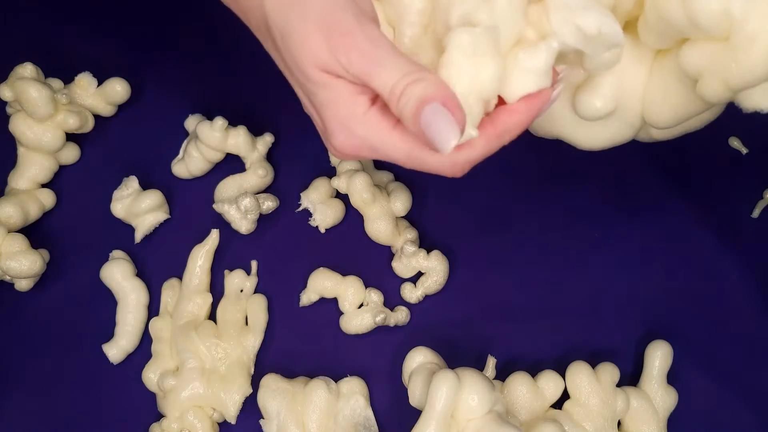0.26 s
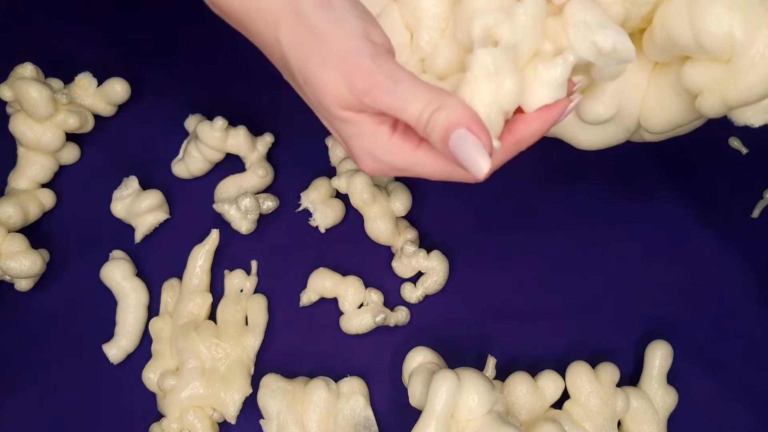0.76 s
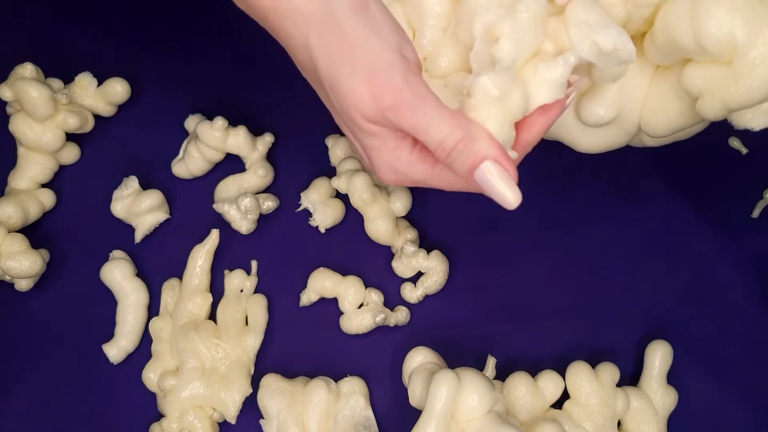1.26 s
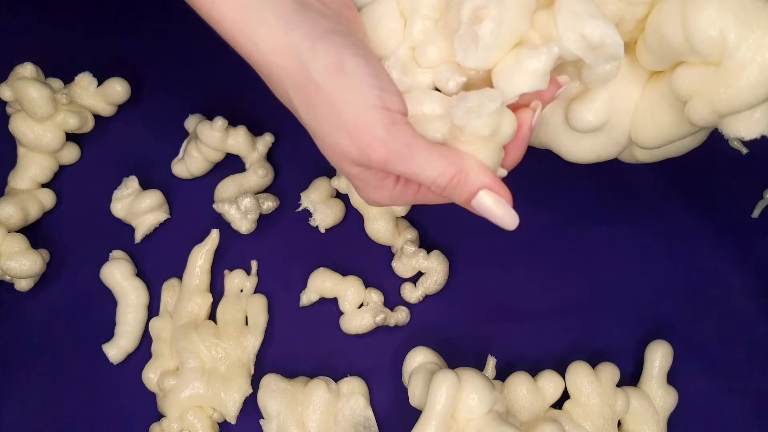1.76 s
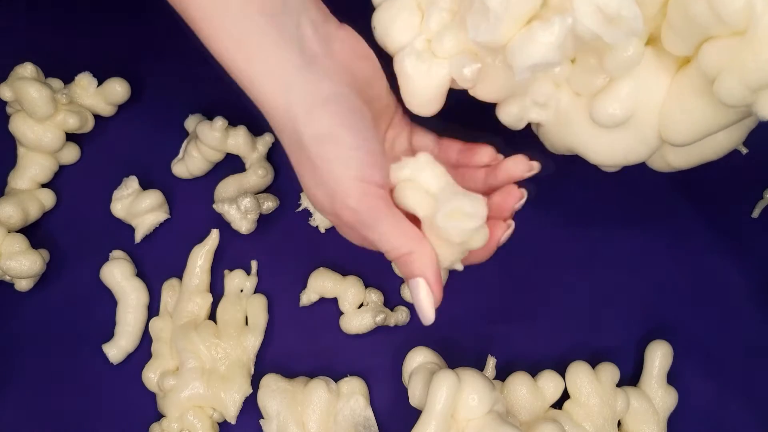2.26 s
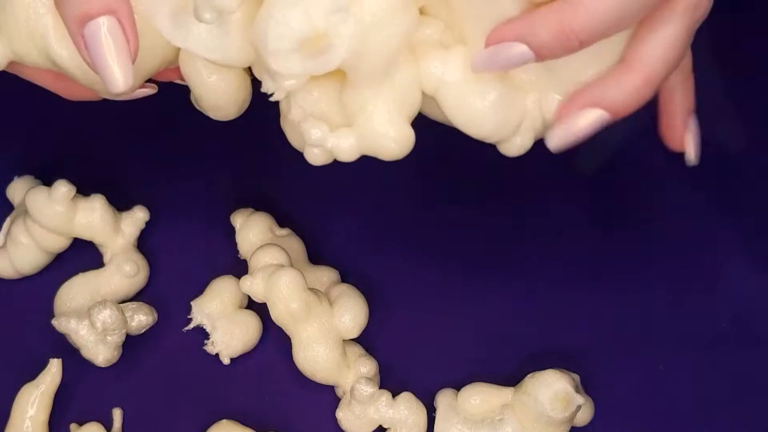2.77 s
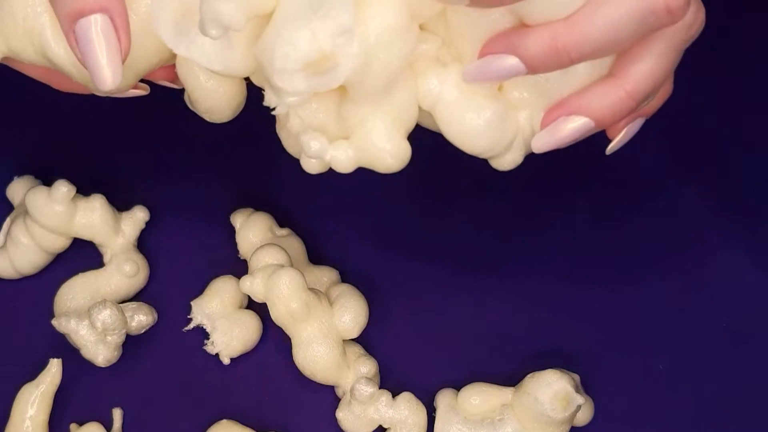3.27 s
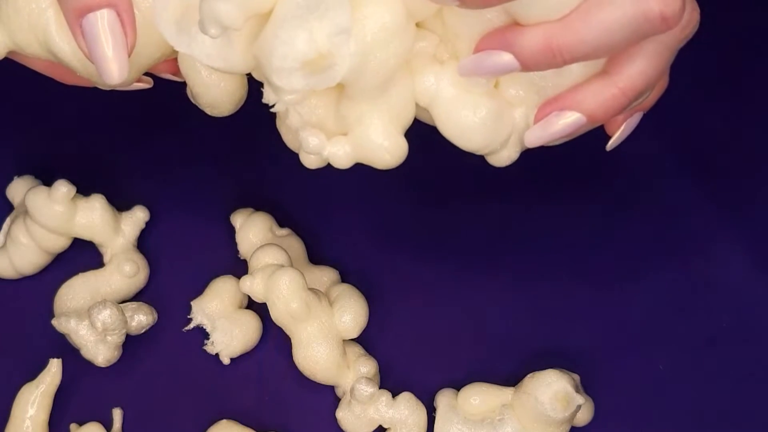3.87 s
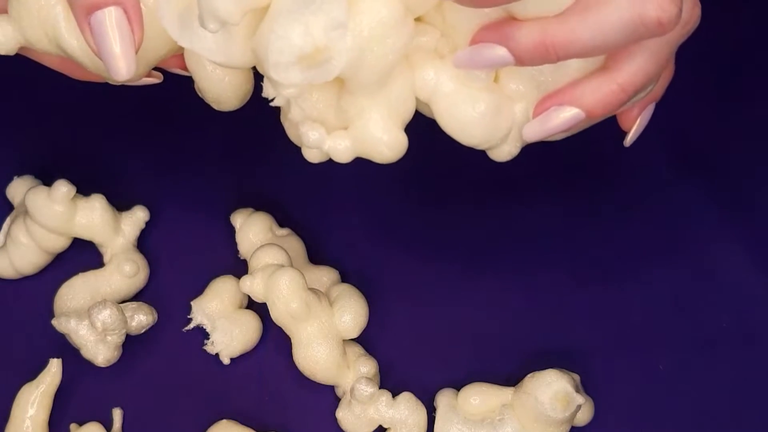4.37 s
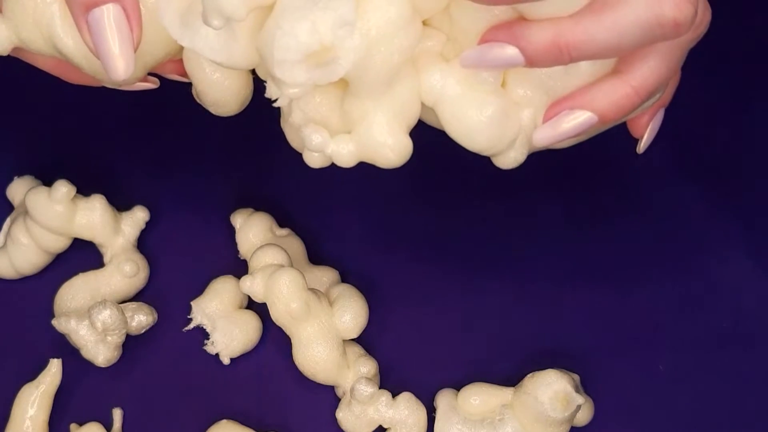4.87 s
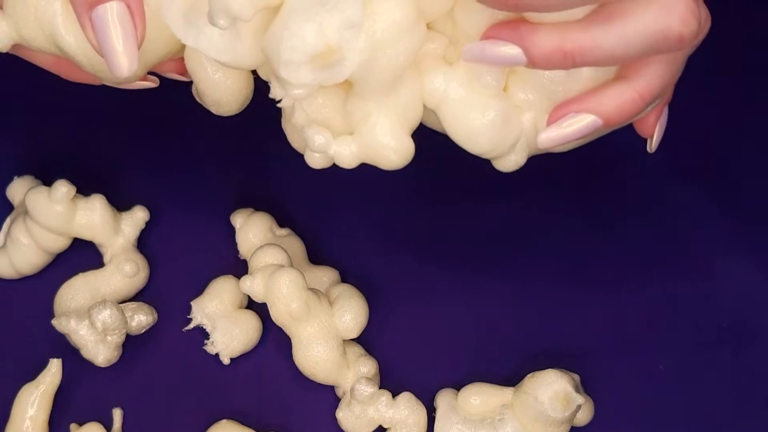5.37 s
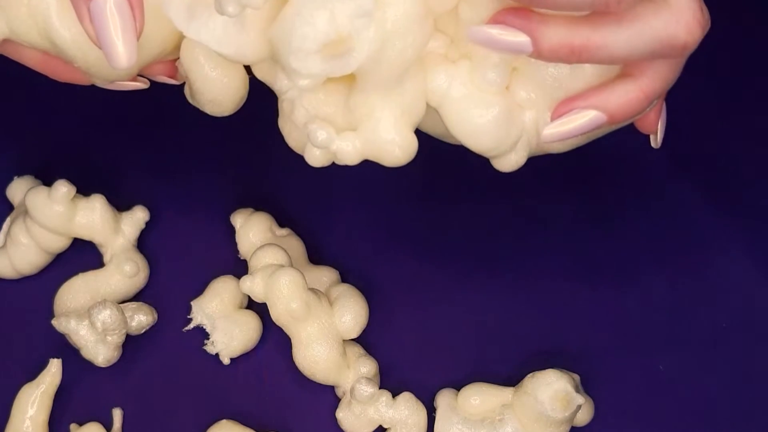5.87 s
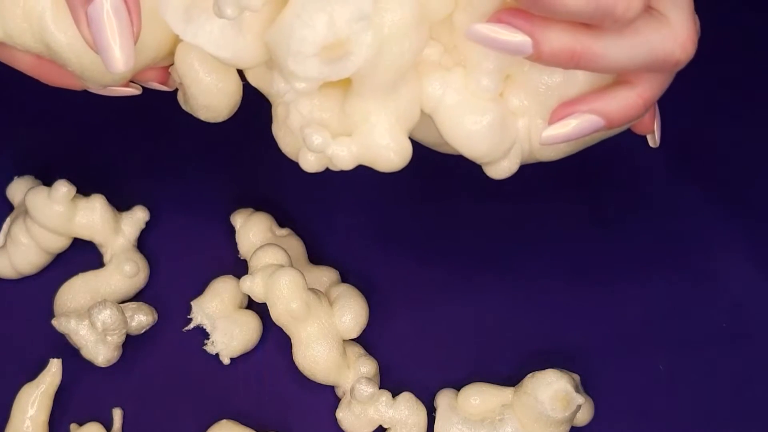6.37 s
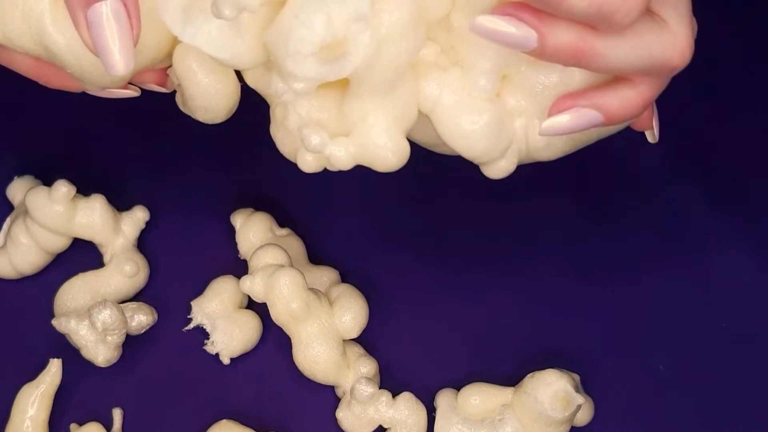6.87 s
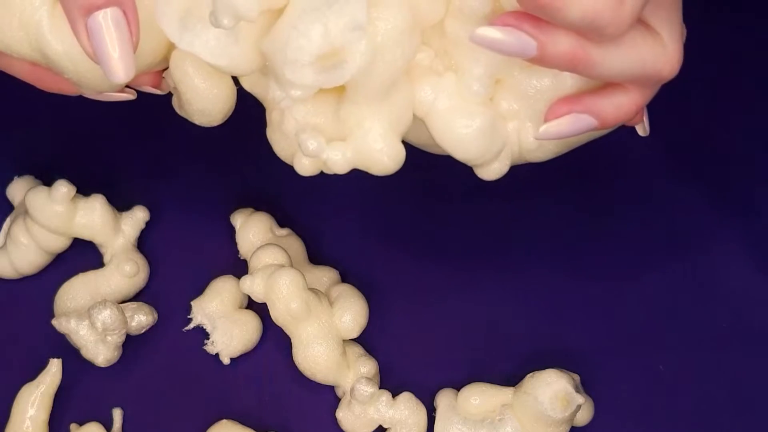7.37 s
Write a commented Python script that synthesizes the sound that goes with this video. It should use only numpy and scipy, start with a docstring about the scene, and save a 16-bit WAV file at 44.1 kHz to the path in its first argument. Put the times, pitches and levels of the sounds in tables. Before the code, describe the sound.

Two hands tear a lump of hardened expanding foam loose with crunchy rips and sharp cracks, then knead the block in dry, crackling squeezes.

```python
"""Tearing and squeezing cured foam

Two hands tear a lump off a block of expanding foam, lay it on cloth, then squeeze the block, near a spaced pair.
Thin cell walls snap in avalanches of short noise pulses (the crunch); struts give way in single cracks.
Every snap is a damped noise burst; filters colour it as lump or block. Rubbing, knocks and creaks join in.
The room is small and quiet: faint air, a low rumble of the arms and a short, dull tail."""
import sys
import numpy as np
from scipy import signal
from scipy.fft import rfft, irfft
from scipy.io import wavfile
from scipy.ndimage import uniform_filter1d

SR = 44100
rng = np.random.default_rng(int(sys.argv[2]) if len(sys.argv) > 2 else 0)


def dump_mix(stems):
    """Bounce the given channels to the path in sys.argv[1] as a 16-bit WAV at rate SR."""
    frames = np.atleast_2d(stems).T  # one column per channel
    limited = np.clip(frames, -1, 1)  # hard clip at full scale
    pcm = np.round(limited * 32767).astype(np.int16)
    wavfile.write(sys.argv[1], SR, pcm)


N = 335601
TIME = np.arange(N) / SR  # [s]

# Levels in the tables are relative; balance trims follow in the functions. Pan is left minus right.
# struts giving way: (time [s], level [dB], body [dB], treble edge [dB], relative decay [s])
CRACKS = [(0.053, -33, -6.5, -8, 0.0052), (0.1946, -17, 12.5, -9.5, 0.014),
          (0.3437, -36.5, 10.5, -9, 0.011), (0.469, -44.5, -3, -8.5, 0.0072),
          (0.6866, -40.5, -11, -11, 0.017), (0.8374, -21, 2.5, -8.5, 0.043), (0.8505, -27.5, -6, -13, .007),
          (0.8722, -28.5, -17, -7, 0.012), (1.029, -30, 0, 21, 0.0079), (1.0479, -25, -14, -22, 0.011),
          (1.0931, -18, 3, -14, 0.0099), (1.114, -26, 9.5, 0, .012), (1.171, -31, 8, 3, 0.013),
          (1.2062, -36, 5.5, -1, 0.0062), (1.2779, -40, -1, -5, 0.0066), (1.2957, -49.5, -9, -1, 0.0078),
          (1.37, -29, 6.5, 1, 0.012), (1.4593, -23, 7, -8, .019), (1.4816, -25, 7, -12, 0.007),
          (1.543, -21, 3.5, -11, 0.043), (1.6255, -39, 2, -8, 0.014), (1.703, -19.5, 6, -14, 0.0071),
          (1.7333, -18.5, 5.5, -20, .008), (2.326, -56, -8, -2, 0.0067), (3.0093, -27, 3.5, -13, 0.0051),
          (3.0682, -44, 7, -3, 0.009), (3.3437, -38, 6.5, -1.5, 0.0067), (3.4315, -36.5, 9, 4.5, 0.013),
          (3.4873, -43.5, 6, 4, 0.015), (3.608, -28, 1.5, -3, 0.011), (3.634, -24.5, 7, 0.5, .011),
          (3.7038, -34.5, 1, 0, 0.027), (3.9346, -40, 3, -4, 0.0083), (3.9688, -35, 4.5, -7, 0.01),
          (3.98, -32, 7.5, -2, 0.037), (4.1709, -40, 1, -4, 0.0062), (4.2651, -19.5, 8, -9, 0.0042),
          (4.315, -34, 5, 3, 0.0084), (4.3526, -38, 4, -2, 0.0074), (4.3807, -40, 7, -1, 0.0057),
          (4.439, -15.5, 7, -23, 0.006), (4.4433, -19.5, 9, -3, 0.0046), (4.5089, -36.5, 18, 14, 0.0058),
          (4.6352, -41.5, 5, 16, 0.0052), (4.921, -39, 1, -4, 0.0073), (4.951, -28.5, 5, -3, .008),
          (5.0378, -31, 4.5, 4, 0.0058), (5.152, -40, 12, 7, 0.0078), (5.23, -36, -12, 4, .014),
          (5.333, -29.5, 8, 3, 0.006), (5.4689, -23.5, 5.5, -1, 0.0042), (5.5976, -37, 13.5, 3.5, 0.03),
          (5.7165, -33, 5, -7, 0.006), (5.7319, -28.5, 4.5, -5.5, 0.016), (5.7644, -28.5, -19, -7, .026),
          (5.893, -33, -2, -5.5, 0.011), (6.0924, -33, 2, 10, 0.0074), (6.1062, -29.5, 0, -5, .011),
          (6.158, -30.5, 1, 0, 0.036), (6.3216, -34, -3, 4, .005), (6.369, -28.5, 3, -3, 0.009),
          (6.4387, -32, 9, 1, 0.0032), (6.589, -32, 2, 0.5, 0.0081), (6.6631, -29, -1, 1, 0.0046),
          (6.7219, -28.5, -7, -12, 0.0081), (6.8744, -29, -2, -2.5, 0.0064), (6.912, -32.5, -15, -8, 0.018),
          (7.018, -40, 2, -4, .01), (7.176, -24, -2, -7, 0.0061), (7.225, -33, 1, -2, 0.01),
          (7.284, -32, 2, -4, .012), (7.4605, -33.5, -3, -10, 0.0069), (7.5676, -42, 2, -9, 0.013)]
# soft knocks of hand and foam: (time [s], level [dB], treble tilt [dB], pan [dB], t60 [s])
KNOCKS = [(0.203, -36.5, -17, -3, 0.031), (.3445, -48, -19, -18, 0.032), (0.846, -54, -15, -2, 0.061),
          (1.106, -38, -20, -11.5, 0.13), (1.47, -35.5, -20, -12, 0.076), (1.737, -35, -13, -5, 0.028),
          (1.9093, -47.5, -9.5, 0.5, 0.03), (2.492, -62.5, -12, -5, 0.088), (2.511, -49.5, -41, -11, 0.055),
          (2.835, -55.5, -30, -2, .05), (2.877, -47.5, -11, 3, 0.044), (4.443, -46, -21, 0, .06)]
# pulls that rip the neck of the lump: (time of peak [s], build-up [s], let-go [s], level [dB])
PULLS = [(0.03, 0.17, 0.085, -43), (0.145, .04, 0.033, -48), (0.235, 0.053, 0.087, -28),
         (0.36, .025, .09, -54.5), (0.665, 0.055, .04, -53.5), (0.84, 0.13, 0.19, -34),
         (1.11, 0.15, .14, -32.5), (1.48, 0.11, 0.12, -29), (1.715, 0.068, 0.034, -40)]
# strokes of skin and cloth on the lump: (time of peak [s], build-up [s], let-go [s], level [dB])
STROKES = [(2.05, 0.092, .1, -66), (2.15, 0.076, 0.065, -63.5), (2.27, 0.067, .06, -54),
           (2.365, 0.015, 0.045, -59.5), (2.495, 0.015, 0.024, -51), (2.58, 0.057, 0.039, -48),
           (2.72, .15, 0.13, -64), (2.86, 0.068, .06, -62.5)]
# short squeezes of the block: (time of peak [s], build-up [s], let-go [s], level [dB])
SQUEEZES = [(3.05, 0.17, .06, -49.5), (3.22, 0.23, 0.18, -56.5), (3.37, 0.028, 0.075, -45.5),
            (3.5, 0.087, 0.11, -49.5), (3.615, 0.038, 0.12, -43), (3.88, 0.11, 0.14, -54),
            (4.08, 0.14, 0.19, -48), (4.3, 0.24, 0.12, -42), (4.45, 0.03, 0.13, -45.5),
            (4.975, 0.034, 0.081, -36.5)]
# crunch of one long, kneading squeeze: (time [s], level [dB])
KNEAD = [(4.6, -75.5), (4.8, -54), (5.1, -48.5), (5.33, -38.5), (5.43, -49), (5.5, -38.5), (5.69, -45),
         (5.76, -36.5), (5.89, -41.5), (6.02, -35), (6.2, -41.5), (6.38, -34), (6.52, -47.5), (6.72, -36),
         (6.79, -45.5), (6.93, -32.5), (7.05, -46.5), (7.31, -40.5), (7.385, -55), (7.47, -43),
         (7.61, -55.5)]
# finger depth in the block: (time [s], depth [0-1], pan [dB])
GRIP = [(2.9, 0.6, 1.5), (3.3, 0.46, 3.5), (3.6, 0.44, 4), (4.2, 0.45, 2.5), (4.65, 0.1, 6), (5.0, 0.2, 5),
        (5.35, 0.38, 4), (5.75, 0.58, 3.5), (6.1, 0.7, 3.5), (6.5, 0.3, 4), (6.9, 0.37, 3), (7.2, 1, 3),
        (7.6, 1, 3.5)]
# creaks of the block shifting in the hands: (time of peak [s], build-up [s], let-go [s], level [dB])
CREAKS = [(4.5, .06, 0.046, -60), (5.63, 0.069, .05, -59.5)]
# low rumble of the arms moving over the table: (time [s], level [dB])
RUMBLE = [(0, -66), (.25, -60.5), (.6, -63.5), (1.1, -65.5), (1.75, -60.5), (2.0, -64), (2.45, -66),
          (2.52, -50), (2.6, -60), (2.88, -66), (3.0, -76.5), (7.6, -72)]
# resonances of the big block: (frequency [Hz], relative level [dB], t60 [s])
BLOCK_MODES = [(291.3, -46, 0.31), (437, -73, 0.39), (687, -40.5, 0.037)]

# spectrum of a snapping strut: (frequency [Hz], gain [dB])
CRACK_COLOUR = [(30, -28.5), (100, -18.5), (200, -23.5), (420, -16), (540, -19.5), (680, -9), (900, -8),
                (1400, -10), (2200, 0), (3800, 4.5), (6000, 8.5), (9000, 4), (13000, 0), (16000, -12)]
# spectrum of the ripping neck: (frequency [Hz], gain [dB])
TEAR_COLOUR = [(30, -24), (120, -18.5), (250, -14), (550, -12), (750, -14.5), (1300, -10), (1600, 1),
               (2100, -0.5), (2800, -0.5), (3700, 3.5), (6000, 0.5), (8500, -2), (12500, -8),
               (15500, -14.5)]
# spectrum of the lump sliding under pressure: (frequency [Hz], gain [dB])
RUB_COLOUR = [(180, -44), (300, -12.5), (568, -17), (658, -4.5), (2000, -8.5), (2560, -5), (5440, -10.5),
              (6620, -11.5), (15000, -33.5)]
# spectrum of the crushed block: (frequency [Hz], gain [dB])
SQUEEZE_COLOUR = [(60, -16), (250, -17.5), (450, -20), (560, -23.5), (660, -16), (790, -16), (980, -4.5),
                  (1350, -18), (2000, -2.5), (3500, 1.5), (5500, 0.5), (8000, 1), (10500, -4), (15500, -8)]
# spectrum of the soft knocks: (frequency [Hz], gain [dB])
KNOCK_COLOUR = [(25, -6), (80, -2), (180, -14.5), (300, -18), (440, -2.5), (850, 0.5), (1500, -2.5),
                (2400, -15.5), (4000, -14.5), (8000, -32), (15000, -43)]
# spectrum of the low creaks: (frequency [Hz], gain [dB])
CREAK_COLOUR = [(60, -18), (170, -8.5), (280, 0), (400, -6), (600, -18), (2000, -48)]
# spectrum of the still room air: (frequency [Hz], gain [dB])
ROOM_COLOUR = [(20, 4), (70, -6.5), (160, -11.5), (270, -8.5), (500, -18), (1400, -24), (3500, -23),
               (10000, -32), (16000, -38.5)]
# further spectra: (frequency [Hz], gain [dB])
RUMBLE_COLOUR = [(15, 1.5), (40, -0.5), (85, -10), (160, -27), (400, -49.5), (2000, -69.5)]
TAIL_COLOUR = [(200, 9.5), (2000, 2.5), (5000, -2), (12000, -19)]
PROXIMITY_COLOUR = [(30, -1), (90, 4.5), (170, 5.5), (300, -7.5), (700, -29.5), (3000, -66.5)]
THIN_RUB_COLOUR = [(1000, -6), (2000, -2), (3600, -1), (6000, -6.5), (12000, 2.5)]
SKIN_COLOUR = [(300, -5.5), (650, 5.5), (1000, 1), (2000, -9.5), (4000, -1), (6500, -1), (8200, 1),
               (10000, -3), (14000, 0)]
CORE_COLOUR = [(600, 0.5), (2000, 0.5), (4000, -0.5), (14000, -4)]
AFTER_RING_COLOUR = [(300, 0.5), (1500, 4), (4000, -10), (12000, -10.5)]
# the small lump rings near 1.5 kHz, where the big block is hollow
LUMP_COLOUR = [(250, 5), (750, -5), (1500, 4), (2500, -0.5)]
BLOCK_COLOUR = [(250, 0), (750, -0.5), (1500, -3), (2500, 0.5)]

TOP_HZ = 15900
LUMP_FREE_S, BLOCK_GRIPPED_S = 1.8, 2.88
LUMP_PAN_DB, CRACK_SCATTER_DB = 0.5, 1.5  # scatter: spread of the struts around the hand
SWELL_DROP_DB = 19.5  # drop one build-up before and one let-go after a gesture's peak
PULL_SQUARENESS, STROKE_SQUARENESS, SQUEEZE_SQUARENESS = 2.66, 1.72, 1.54  # 1 pointed; higher holds, then stops
STICK_S, STICK_DB = 0.018, -5.5  # crunch falls back while a strut takes the load
FAINT_COPY_S, FAINT_COPY_DB, LOUD_CRACK_DB = 0.0054, -19, -31.5  # lead, relative level, least table level
AFTERSHOCK_DB, AFTERSHOCK_PER_DB, AFTERSHOCK_T60_S = -33.5, 0.52, 0.22  # at a 0 dB crack; share of its dB
TEAR_POPS_DB, LIGHT_POPS_DB, HARD_POPS_DB = -4.5, -4, -8.5  # larger cells against the fine crunch
SLIPS_PER_S = 430


def undb(db):
    """Decibels to gain."""
    return 10 ** (np.asarray(db) / 20)


def decibels(gain):
    """Gain to decibels."""
    return 20 * np.log10(gain)


def curve(rows):
    """Control joined by straight lines."""
    return np.interp(TIME, *np.transpose(rows))


def rms(x):
    """Root mean square, kept above zero."""
    return np.sqrt(np.mean(x ** 2)) + 1e-12


def pan(db):
    """Left and right gains of constant power; db is left minus right."""
    gains = undb(np.array([[1], [-1]]) * db / 2)
    return gains / np.sqrt(np.mean(gains ** 2, axis=0))


def add(out, start_s, x):
    """Mix a short sound in at start_s."""
    i = max(int(start_s * SR), 0)
    out[:, i:i + x.shape[1]] += x[:, :max(N - i, 0)]


def convolve(x, response):
    """Filter along time, keeping the length."""
    return signal.fftconvolve(np.atleast_2d(x), np.atleast_2d(response), axes=1)[:, :x.shape[-1]]


def colour(x, *spectra, size=4096):
    """Minimum-phase filter whose gain is the sum of the (Hz, dB) spectra."""
    log_hz = np.log(np.maximum(np.arange(size // 2 + 1), 1) * SR / size)
    gain_db = 0
    for spectrum in spectra:
        hz, db = np.transpose(spectrum)
        gain_db = gain_db + np.interp(log_hz, np.log(hz), db)
    # fold the cepstrum to its causal half
    cepstrum = irfft(np.log(undb(gain_db)))
    cepstrum[1:size // 2] *= 2
    cepstrum[size // 2 + 1:] = 0
    return convolve(x, irfft(np.exp(rfft(cepstrum))))


def walk(rate_hz):
    """Smooth chance of about unit spread, with rate_hz random knots a second."""
    knots = rng.standard_normal(N // 8)
    return np.interp(TIME * rate_hz, np.arange(len(knots)), knots) * np.sqrt(3 / 2)


def fade(t_s, t60_s):
    """Decay by 60 dB in t60_s."""
    return np.exp(-np.log(1000) * t_s / t60_s)


def swells(rows, squareness):
    """Gain of hand gestures: each builds up to its hardest moment and lets go."""
    power = np.full(N, 1e-12)
    for peak_s, build_s, let_go_s, db in rows:
        span = slice(*np.searchsorted(TIME, [peak_s - 2 * build_s, peak_s + 2 * let_go_s]))
        away = np.maximum((peak_s - TIME[span]) / build_s, (TIME[span] - peak_s) / let_go_s)
        power[span] += undb(db - SWELL_DROP_DB * away ** squareness) ** 2
    return np.sqrt(power)


def ring(t60_s, shared, spread_s, split_s=0, size=1024):
    """Noise pulse from one spot of foam at both microphones: a shared part, scatter and a random lag."""
    since_split_s = np.maximum(np.arange(size) / SR - split_s, 0)
    common, left, right = rng.standard_normal((3, size)) * fade(since_split_s, t60_s)
    shared = np.clip(shared, 0, 1)
    pair = np.sqrt(shared) * common + np.sqrt(1 - shared) * np.array([left, right])
    lag = int(SR * spread_s * rng.normal(-0.4, 1))  # samples; positive delays the right
    delayed = [np.pad(side, (max(d, 0), 0))[:size] for side, d in zip(pair, (-lag, lag))]
    return np.array(delayed) / rms(pair)


def spot_sound(sizes, t60_s):
    """The snaps of one spot at both microphones."""
    return signal.fftconvolve(sizes[None], ring(t60_s, shared=0.51, spread_s=0.0004), axes=1)


def cells(rate_hz, size_db, cluster_db, cluster_hz, t60_s, count=3, size=1500):
    """Cell walls snap in avalanches, levelled; the break creeps on, so its colour keeps shifting."""
    snaps = rng.random(N) < rate_hz / SR
    scatter_db = size_db * np.clip(rng.standard_normal(N), -2, 2)
    avalanche_db = cluster_db * np.clip(walk(cluster_hz), -2, 2)
    sizes = snaps * undb(scatter_db + avalanche_db)
    smooth_power = uniform_filter1d(uniform_filter1d(sizes ** 2, int(0.054 * SR)), int(0.036 * SR))
    sizes /= np.sqrt(np.maximum(smooth_power, 1e-6))
    sizes *= rng.choice([-1, 1], N)
    # count spots break at once; every size samples a fresh one takes over from the oldest
    spot = np.arange(N) // size - rng.integers(0, count, N)
    out = np.zeros((2, N))
    for k in range(1 - count, N // size):
        span = slice(max(k, 0) * size, (k + count) * size)
        add(out, span.start / SR, spot_sound(sizes[span] * (spot[span] == k), t60_s))
    return out


def ticks(start_s, end_s, rate_hz, size_db, t60_s):
    """Larger cells pop singly, each with its own pitch and brightness; unit level from start to end."""
    out, at_s = np.zeros((2, N)), start_s
    for wait, size, pitch, bright in rng.random((800, 4)):
        at_s -= np.log(1 - wait) / rate_hz
        if at_s > end_s:
            break
        hz = 2000 * 4 ** pitch
        peak = [(hz / 2, 0), (hz, 6), (hz * 2, 0)]
        brightness = [(3000, 0), (12000, 8 * bright - 2)]
        x = ring(t60_s, shared=0.69, spread_s=0.00031, split_s=0.00085, size=512)
        x = colour(x, peak, brightness, size=256)
        add(out, at_s, x / rms(x) * undb(size_db * size))
    return out / rms(out[:, int(start_s * SR):int(end_s * SR)])


def stalling(effort):
    """Gain of a crunch that stalls before each crack, unless the hands press hard enough to keep it going."""
    stuck = np.zeros(N)
    for crack_s, *_ in CRACKS:
        stuck[int(max(crack_s - STICK_S, 0) * SR):int(crack_s * SR)] = 1
    lightness = np.interp(decibels(effort), [-48, -35], [1, 0])
    return effort * undb(STICK_DB * lightness * uniform_filter1d(stuck, size=256))


def aftershocks():
    """Gain of the cells that collapse after a strut of the block has given way."""
    power = np.zeros((1, N))
    decay = fade(TIME[None, :SR // 2], AFTERSHOCK_T60_S)
    for crack_s, db, *_ in CRACKS:
        if crack_s > BLOCK_GRIPPED_S:
            add(power, crack_s, (undb(AFTERSHOCK_DB + AFTERSHOCK_PER_DB * db) * decay) ** 2)
    return np.sqrt(power[0])


def background():
    """Still room air, and the rumble of arms near the right microphone: filtered noise."""
    air = colour(rng.standard_normal((2, N)) + 0.08 * rng.standard_normal(N), ROOM_COLOUR)
    rumble = colour(rng.standard_normal((2, N)) + rng.standard_normal(N), RUMBLE_COLOUR)
    rumble_gain = undb(curve(RUMBLE) + 2.5 * walk(4.7)) * pan(-11)
    return air / rms(air) * undb(-68.5) + rumble / rms(rumble) * rumble_gain


def room(x, t60_s, wet_db):
    """Short, dull reflections of a small furnished room: a decaying noise tail."""
    t_s = TIME[:SR // 2]
    tail = rng.standard_normal((2, len(t_s))) * fade(t_s, t60_s) * (t_s > 0.004)
    tail /= np.sqrt(np.sum(tail ** 2) / 2)
    return undb(wet_db) * colour(convolve(x, tail), TAIL_COLOUR)


def proximity(x):
    """The lump is torn right beside the right microphone, which swells its bass."""
    return colour(x * (TIME < LUMP_FREE_S), PROXIMITY_COLOUR) * pan(-29.5)


def block(x):
    """Once the block is gripped, every snap rings its damped low modes."""
    t_s = TIME[:SR // 2]
    response = np.zeros(len(t_s))
    for hz, db, t60_s in BLOCK_MODES:
        gain = undb(db) / np.sqrt(t60_s * SR / 1000)
        response += gain * np.sin(2 * np.pi * hz * t_s) * fade(t_s, t60_s)
    return convolve(x * (TIME > BLOCK_GRIPPED_S), response)


def knocks(size=8192):
    """Soft, hollow bumps: decaying noise bursts."""
    out = np.zeros((2, N))
    for at_s, db, tilt_db, pan_db, t60_s in KNOCKS:
        burst = ring(t60_s, shared=0.49, spread_s=0.00026, size=size)
        x = colour(burst, KNOCK_COLOUR, [(80, 0.0023), (700, tilt_db)])
        energy = np.sum(x ** 2) / 2 / (SR / 100)  # mean of the sides, per 10 ms
        add(out, at_s, x / np.sqrt(energy) * pan(pan_db) * undb(db))
    return out


def creaking():
    """The strained block sticks and slips against the palm: random slips make a short low groan."""
    slips = (rng.random(N) < SLIPS_PER_S / SR) * (1 + rng.standard_normal((2, N)) / 2)
    groan = colour(slips - slips.mean(), CREAK_COLOUR)
    return groan / rms(groan) * swells(CREAKS, SQUEEZE_SQUARENESS) * pan(7)


def rubbing():
    """The lump slides on palm and cloth: a thin whisper at light touch, fuller under pressure."""
    effort = swells(STROKES, STROKE_SQUARENESS)
    grains = cells(5000, size_db=3.5, cluster_db=5, cluster_hz=400, t60_s=0.051)
    full = colour(grains, RUB_COLOUR)
    thin = colour(full, THIN_RUB_COLOUR)
    pressure = np.clip((decibels(effort) + 64) / 12, 0, 1)
    slide = pressure * full + (1 - pressure) * thin
    return slide / rms(slide) * effort * pan(-0.27) * undb(-2)


def tearing():
    """The neck of the lump rips: the harder the pull, the more cells snap."""
    effort = swells(PULLS, PULL_SQUARENESS)
    rate_hz = 2800 * undb(0.35 * (decibels(effort) + 36.5))
    fine = cells(rate_hz, size_db=4, cluster_db=3, cluster_hz=300, t60_s=0.015)
    pops = ticks(0, LUMP_FREE_S, rate_hz=90, size_db=12, t60_s=0.008)
    crunch = (fine / rms(fine) + undb(TEAR_POPS_DB) * pops) * stalling(effort)
    coloured = colour(crunch, TEAR_COLOUR)
    return coloured * rms(crunch) / rms(coloured) * pan(-1.5) * undb(-2)


def squeezing():
    """Fingers work the block, shallower and deeper by turns: separate ticks when light, dense crunch when hard."""
    grip = np.array(GRIP)
    depth = np.clip(curve(grip[:, [0, 1]]), 0, 1)
    pan_db = curve(grip[:, [0, 2]])
    kneading = undb(curve(KNEAD)) * (TIME > KNEAD[0][0])
    hands = np.hypot(swells(SQUEEZES, SQUEEZE_SQUARENESS), kneading)
    effort = np.hypot(stalling(hands), aftershocks())
    effort_db = decibels(effort)
    rate_hz = 2600 * undb(0.7 * (np.maximum(effort_db, -70) + 38))
    # light grip: avalanches and larger cells stand apart; pressed harder, they run together
    gaps_db = np.interp(effort_db, [-52, -38], [6.5, 3.6])
    pops_db = np.interp(effort_db, [-52, -38], [LIGHT_POPS_DB, HARD_POPS_DB])
    fine = cells(rate_hz, size_db=1.5, cluster_db=gaps_db, cluster_hz=220, t60_s=0.0085)
    pops = ticks(BLOCK_GRIPPED_S, TIME[-1], rate_hz=48, size_db=9, t60_s=0.006)
    crunch = colour(fine / rms(fine) + undb(pops_db) * pops, SQUEEZE_COLOUR)
    # depth blends the skin colour into the core colour
    skin = colour(crunch, SKIN_COLOUR)
    core = colour(crunch, CORE_COLOUR)
    crush = depth * core + (1 - depth) * skin
    return crush / rms(crush) * effort * pan(pan_db) * undb(1.16)


def cracks(size=4096):
    """A strut splits, thick ones for longer, with a faint copy just ahead if loud; the piece rings on, duller."""
    out = np.zeros((2, N))
    grip_s, _, grip_pan_db = np.transpose(GRIP)
    for at_s, db, body_db, edge_db, decay_s in CRACKS:
        in_lump = at_s < BLOCK_GRIPPED_S
        hand_pan_db = LUMP_PAN_DB if in_lump else np.interp(at_s, grip_s, grip_pan_db)
        pan_db = hand_pan_db + CRACK_SCATTER_DB * rng.standard_normal()
        split_s = np.interp(db, [-35, -20], [0.0003, 0.001])
        snap = ring(decay_s * 2.14, shared=0.72, spread_s=0.00024, split_s=split_s, size=size)
        after = colour(ring(0.044, shared=0.57, spread_s=0.0003, size=size), AFTER_RING_COLOUR)
        x = snap / rms(snap) + undb(-11 + 0.26 * body_db) * after / rms(after)
        piece = LUMP_COLOUR if in_lump else BLOCK_COLOUR
        balance = [(90, 1.32 * body_db), (700, body_db), (3300, 0), (10500, edge_db)]
        x = colour(x, CRACK_COLOUR, piece, balance)
        energy = np.sum(x ** 2, axis=1, keepdims=True) / (SR / 100)  # each side, per 10 ms
        crack = x / np.sqrt(energy) * pan(pan_db) * undb(db - 2)
        add(out, at_s, crack)
        if db > LOUD_CRACK_DB:
            add(out, at_s - FAINT_COPY_S, crack * undb(FAINT_COPY_DB))
    return out


def scene():
    """All the foam sounds in their room."""
    foam = tearing() + squeezing() + cracks()
    near = foam + block(foam) + proximity(foam) + rubbing() + creaking() + knocks()
    return near + room(near, t60_s=0.13, wet_db=-20.5) + background()


def record(dry):
    """Steep elliptic low-pass cuts the top."""
    return signal.sosfilt(signal.ellip(8, 0.2, 70, TOP_HZ, fs=SR, output="sos"), dry)


dry = scene()
out = record(dry)
dump_mix(out)
```